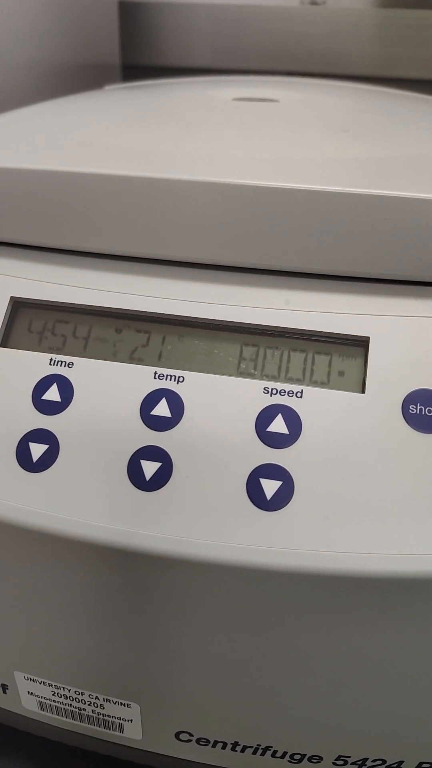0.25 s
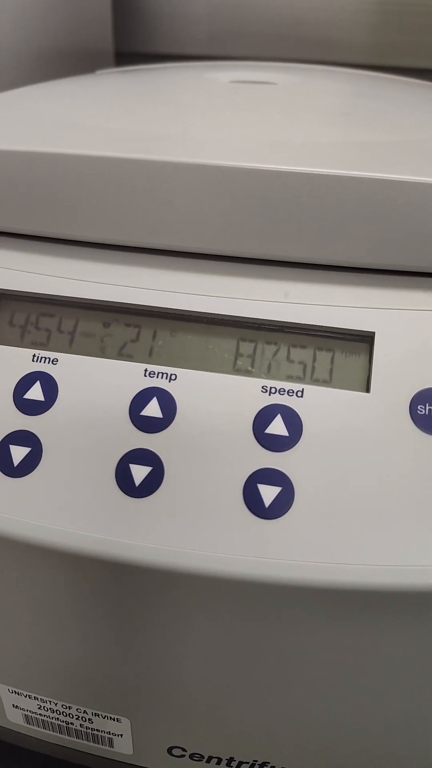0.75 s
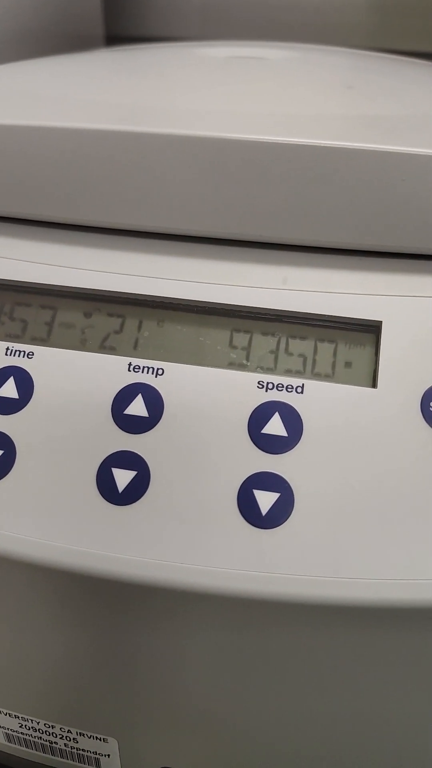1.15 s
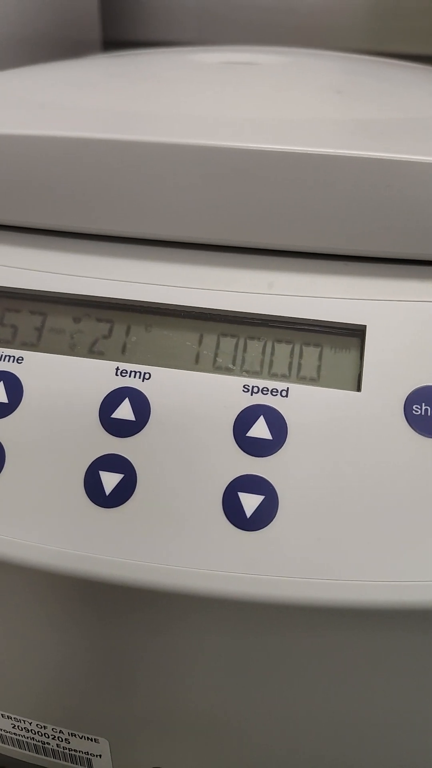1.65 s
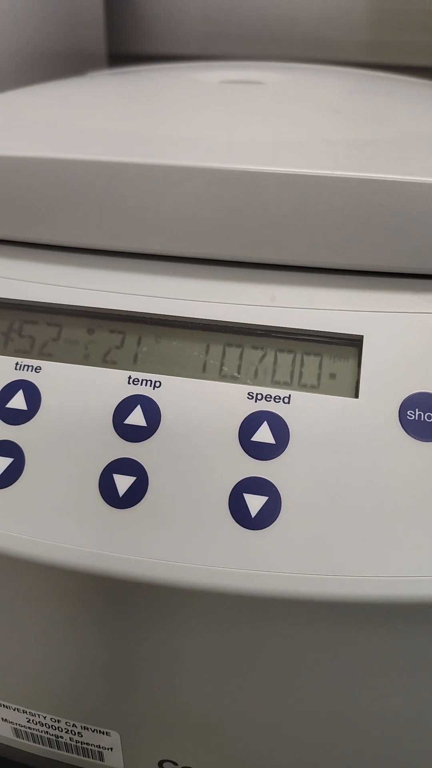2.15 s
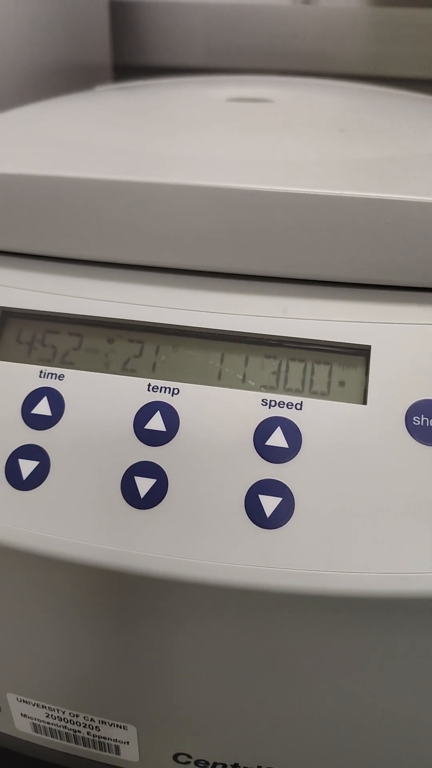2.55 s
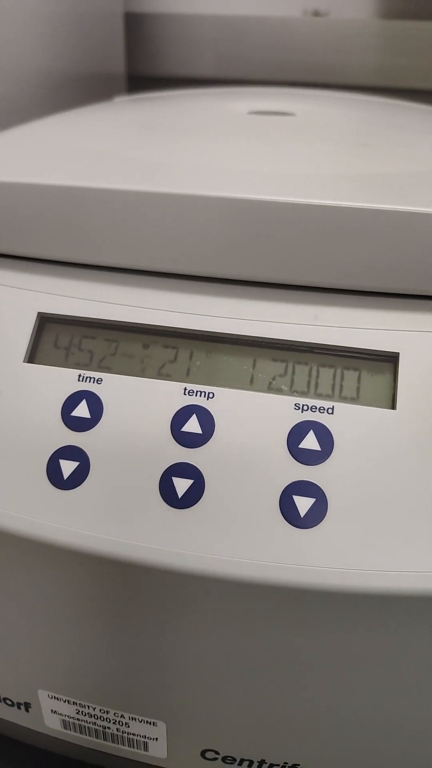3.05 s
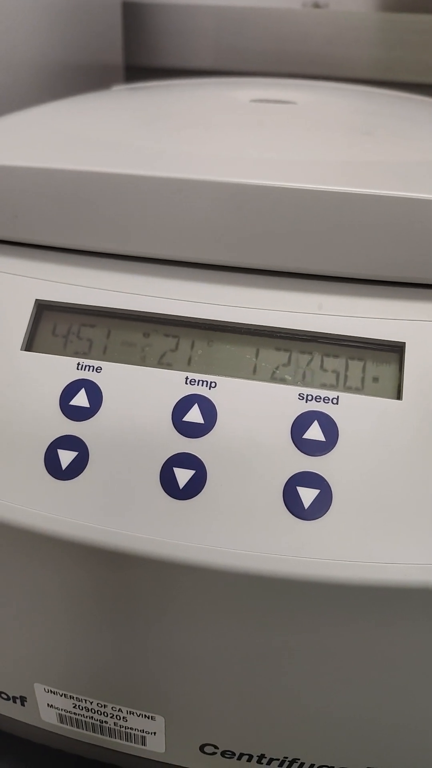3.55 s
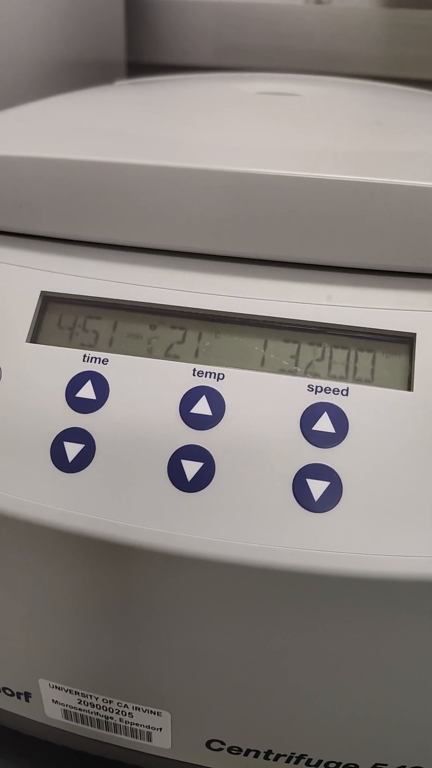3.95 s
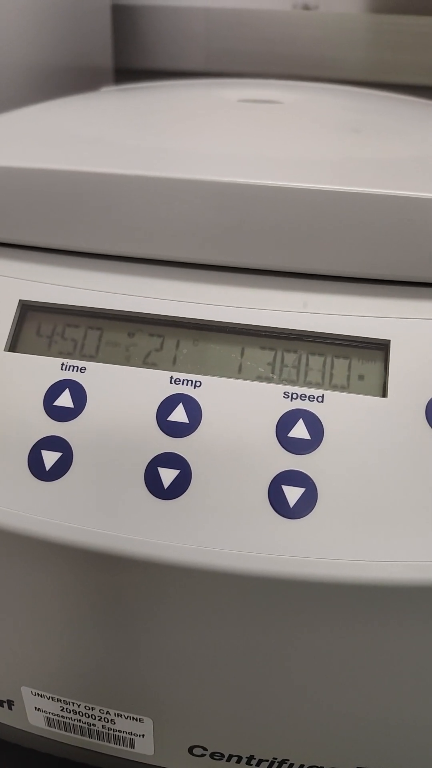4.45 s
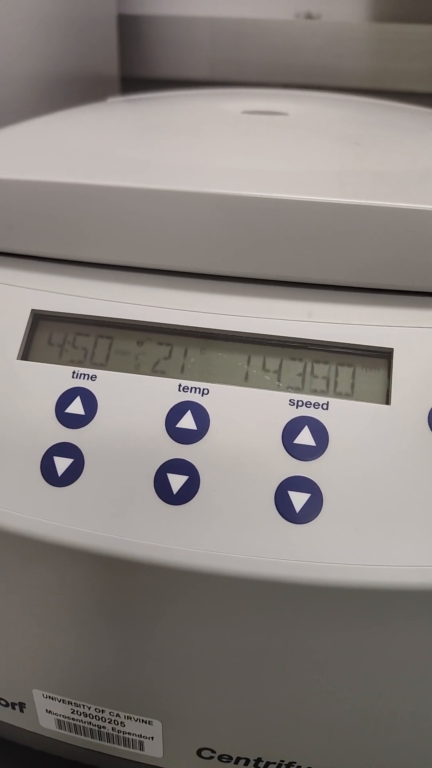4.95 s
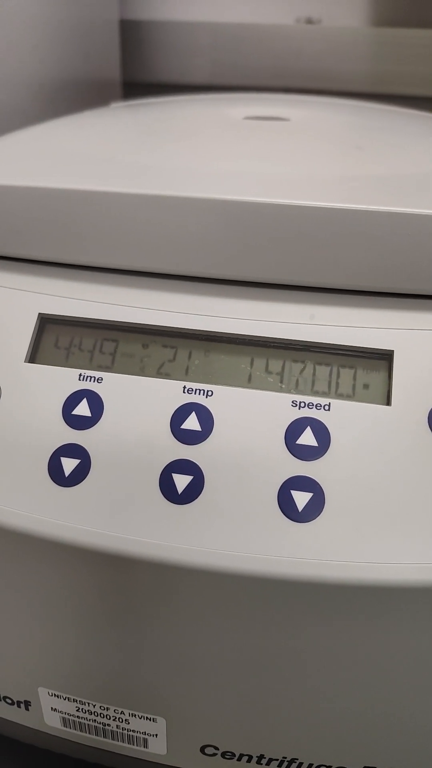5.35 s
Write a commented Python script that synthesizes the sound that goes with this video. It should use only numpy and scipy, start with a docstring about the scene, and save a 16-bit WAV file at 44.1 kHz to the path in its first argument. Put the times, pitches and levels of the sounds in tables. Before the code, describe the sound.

A laboratory centrifuge is already spinning at the start and keeps accelerating for about five and a half seconds, heard close on a hand-held stereo phone. A low drone near 127 Hz glides up to almost twice that pitch, with overtones above it and rough, thin bearing whines shimmering in the treble. Steady mid-pitched hum, slowly varying high electrical tones and fan noise lie behind. Around 1.3 to 1.7 seconds a bass rumble swells, then recedes by 2. Short whistling harmonics rise and fade throughout, and faint high drive tones are clearest around 2.5 to 3. From 3 seconds the rumble and airy hiss build, fullest near 5. The climb slows in the last second, the drone grows strong and a buzzy lid rattle joins at its resonances. At 5.4 a tiny sharp metallic double tick sounds at left. The highs are brighter left; the machine is still running at the end.

```python
"""A bench centrifuge speeds up in a laboratory, heard from a hand-held phone just in front of it.
Unbalance, motor field and bearing balls give sines on multiples of the shaft speed, shaped by resonances;
a lid rattles, and noise stands for the air round the rotor. Cooling machinery hums on steady tones, a metal
part ticks, and fan noise and a bass rumble lie behind. The left microphone port is far brighter than the right."""
import sys
import numpy as np
from scipy import signal
from scipy.fft import rfft, irfft
from scipy.io import wavfile
from scipy.ndimage import uniform_filter1d

SR = 44100
rng = np.random.default_rng(int(sys.argv[2]) if len(sys.argv) > 2 else 0)


def unload_audio(sound):
    """Save the sound as a 16-bit wav file, at the path given as the first command line argument."""
    columns = np.transpose(np.atleast_2d(sound))
    # keep every value between -1 and 1, then stretch to whole-number steps
    steps = np.round(np.clip(columns, -1, 1) * 32767)
    wavfile.write(sys.argv[1], SR, steps.astype(np.int16))


N = 246502  # length in samples
FIELD_ORDER, BALL_ORDER = 4.115, 5.355  # motor field and bearing balls, in multiples of shaft speed


def undb(db):
    """Decibel law: 20 dB is a factor of ten in amplitude."""
    return 10 ** (np.asarray(db) / 20)


def level(x, db):
    """Root-mean-square scaling: brings a sound to the given level in dB."""
    return x * undb(db) / np.sqrt(np.mean(x ** 2))


def columns(table):
    """Linear interpolation in time: every column of a curve, one value a sample."""
    s, *values = np.transpose(table)
    return np.array([np.interp(np.arange(N) / SR, s, column) for column in values])


def at(table, hz):
    """Logarithmic frequency scale: reads a spectrum table at the given pitch."""
    table_hz, value = np.transpose(table)
    return np.interp(np.log(np.maximum(hz, 1)), np.log(table_hz), value)


def walk(rate_hz):
    """Slow random modulation: random steps at this rate, smoothed twice, with a spread near 1."""
    hold = int(SR / rate_hz)
    steps = np.repeat(rng.standard_normal(N // hold + 1), hold)
    smooth = uniform_filter1d(uniform_filter1d(steps, hold), hold)
    return 1.3 * smooth[:N]


def tone(turns, lead=0., start=None):
    """Simple harmonic motion: a sine of rms 1 at both ports, the left ahead by `lead` radians."""
    if start is None:
        start = rng.random()  # starting phase in turns
    port_lead = np.array([[.5], [-.5]]) * lead
    return np.sqrt(2) * np.sin(2 * np.pi * (turns + start) + port_lead)


def panned(x, pan_db):
    """Interaural level difference: half the left-minus-right dB is given to each port, with its sign."""
    return x * undb(np.array([[.5], [-.5]]) * pan_db)


def band(x, lo_hz, hi_hz):
    """Band-pass filtering: keeps one stretch of the spectrum."""
    return signal.sosfilt(signal.butter(2, [lo_hz, min(hi_hz, .45 * SR)], "band", fs=SR, output="sos"), x)


# phase by which the left port leads the right: (frequency [Hz], lead [rad])
PORT_LEAD = [(700, 0), (2330, -2.8), (3960, -6.8), (7060, -12.4), (11800, -14)]


def lead_at(hz):
    """Interaural phase difference: the lead of the left port depends on pitch."""
    return at(PORT_LEAD, hz)


# likeness of the sound at the two ports: (frequency [Hz], shared share of power [0-1])
PORT_LIKENESS = [(60, .93), (600, .86), (1300, .4), (2900, .3), (6000, .35), (14000, .05)]
# brightness of the left port against the right: (frequency [Hz], left minus right [dB])
PORT_BALANCE = [(60, 1.5), (200, -1.5), (600, 7.5), (1200, 2), (4000, -2), (6000, -0.5), (7200, 10),
                (8200, 15.5), (10500, 15), (13500, 5)]


def ports(spectrum, shared, resonances=()):
    """Partial coherence: colours a sound and mixes in unrelated noise at each port."""
    hz = np.arange(N // 2 + 1) * SR / N
    alike = np.clip(at(PORT_LIKENESS, hz), 0, 1)
    lead = np.exp(.5j * np.array([[1], [-1]]) * lead_at(hz))
    own = rfft(rng.standard_normal((2, N)))
    both = np.sqrt(alike) * rfft(shared) * lead + np.sqrt(1 - alike) * own
    colour_db = at(spectrum, hz)
    for centre_hz, width_hz, db in resonances:
        colour_db = colour_db + db / (1 + (2 * (hz - centre_hz) / width_hz) ** 2)
    return irfft(panned(both * undb(colour_db), at(PORT_BALANCE, hz)), N)


# run-up of the shaft: (time [s], speed [turns/s])
SHAFT_SPEED = [(0, 127.07), (.64, 142.38), (1.6, 166.25), (2.88, 196.82), (3.2, 204.25), (3.52, 211.09),
               (4.16, 223.73), (4.48, 229.8), (4.8, 235.5), (5.12, 240.6), (5.44, 244.89), (5.59, 246.54)]


def shaft_speed():
    """Angular acceleration: shaft turns per second at every sample."""
    return columns(SHAFT_SPEED)[0]


def response(hz, modes, order=1):
    """Resonance: gain at a moving pitch, the modes summed in power; a higher order has steeper flanks."""
    power = 0
    for centre_hz, width_hz, *db in modes:
        flank = (1 + (2 * (hz - centre_hz) / width_hz) ** 2) ** order
        power = power + (undb(db)[:, None] / flank) ** 2
    return np.sqrt(power)


# modes of rotor mount and bench: (centre [Hz], width [Hz], gain [dB])
MOUNT_MODES = [(151.8, 12.8, -36), (161, 8.3, -36.5), (180.5, 10.6, -45.5), (202.3, 7.6, -30),
               (212.9, 17, -30.5), (227.4, 7, -33), (237.74, 6.8, -18), (243.8, 9.5, -26)]
# modes of the casing: (centre [Hz], width [Hz], gain [dB])
CASING_MODES = [(403.2, 36, -40), (495, 28, -44.5), (544.3, 89, -38.5), (625.5, 55, -40), (683, 67, -42),
                (752, 70, -42), (775, 57, -42), (872, 130, -45), (919, 71, -40), (986, 34, -38)]
BETWEEN_DB = -56.5  # gain away from the modes


def shaking(hz):
    """Forced vibration: gain in dB of a low tone as it crosses the modes of mount and casing."""
    modes = np.hypot(response(hz, MOUNT_MODES)[0], response(hz, CASING_MODES, order=2)[0])
    return 20 * np.log10(np.hypot(modes, undb(BETWEEN_DB)))


# harmonics of the shaft, then the motor field: (multiple of shaft speed)
SHAFT_ORDERS = [1, 2, 3, 4, FIELD_ORDER]
# for each, added to the modes: (level at full speed [dB], gain per doubling of speed [dB], left minus right [dB])
SHAFT_LEVELS = [(0.9, 0, 3.5), (4, 12.5, 4.5), (2.5, 18, -2.5), (-2, 22, 3.5), (-4, -2, -5)]
# extra balance of the first harmonic: (frequency [Hz], left minus right [dB])
MOUNT_PAN = [(127, 1), (145, -1), (162, 0.5), (175, 1), (222, -11), (235, -2.5), (247, -6)]
FULL_SPEED = 240  # turns/s
FIELD_FADES_AT, FIELD_FADE_DB = 229, 1.8  # turns/s; dB lost per turn/s above it


def rotor(speed, turns):
    """Rotating unbalance: clean tones on the shaft speed swell as they cross the resonances."""
    out = 0
    for order, (db, gain_db, pan_db) in zip(SHAFT_ORDERS, SHAFT_LEVELS):
        heard_db = db + gain_db * np.log2(speed / FULL_SPEED) + shaking(order * speed) + 1.57 * walk(12)
        if order == FIELD_ORDER:  # the field tone dies away near full speed
            heard_db -= FIELD_FADE_DB * np.maximum(speed - FIELD_FADES_AT, 0)
        if order == 1:
            pan_db = pan_db + at(MOUNT_PAN, speed)
        out = out + panned(undb(heard_db) * tone(order * turns), pan_db)
    return out


SLIP_TURNS, SLIP_PER_S = .002, 40  # spread of the slip in turns; its random steps per second


def slipping_balls(turns):
    """Phase modulation: the balls slip a little, which roughens their high harmonics."""
    return turns + SLIP_TURNS * walk(SLIP_PER_S)


# harmonics of bearing balls and motor slots: (multiple of shaft speed)
BALL_ORDERS = [22.03, 24.75, 26.07, 28.02, 31.41, 6 * BALL_ORDER, 36.75, 7 * BALL_ORDER, 41.9, 42.88, 47.25,
               48.2, 52.55, 10 * BALL_ORDER, 57.9, 11 * BALL_ORDER, 63.91]
# for each, before the resonances: (left [dB], right [dB])
BALL_LEVELS = [(-42, -45), (-50, -51), (-45, -52), (-38, -50), (-45, -55), (-38, -43), (-52, -62),
               (-53, -63), (-56, -66), (-47, -58), (-49, -63), (-50, -62), (-47, -60), (-53, -65),
               (-52, -66), (-51, -66), (-52, -68)]
# treble resonances they sing on: (centre [Hz], width [Hz], left gain [dB], right gain [dB])
TREBLE_RINGS = [(4050, 550, -21, -13), (4680, 300, -18, -10), (5300, 300, -22, -17), (6740, 300, -3, -2),
                (7060, 480, 1, 0), (7450, 420, -2, 0), (8530, 280, 5, -8)]


def whine(speed, turns, waver_db=3):
    """Resonant amplification: high harmonics stand out, in patches, as they cross a treble resonance."""
    out = 0
    for order, db in zip(BALL_ORDERS, BALL_LEVELS):
        heard = undb(np.array(db)[:, None] + waver_db * walk(13))
        ring = response(order * speed, TREBLE_RINGS, order=2)
        out = out + heard * ring * tone(order * turns, 2 * np.pi * rng.random())
    return out


# harmonics that sing out for a moment:
# (middle [s], multiple of shaft speed, length [s], left [dB], right [dB])
SWELLS = [(.7, 5.02, 1.4, -53, -54), (1.62, 10.2, 0.55, -53.0, -50.0), (2.75, 15.51, .8, -66.0, -56.0),
          (3.2, 5.02, 1.1, -51.0, -53.0), (4.05, 6.02, 0.7, -54.0, -64.0), (4.35, 5, 1.1, -50, -52),
          (4.85, 10.0, 0.6, -54.0, -54.0), (5.0, 6.02, 1.1, -54.0, -71.0), (5.03, 15.5, 1.1, -59.0, -64.0),
          (5.45, 21.64, .6, -51, -57), (5.5, 20.83, .5, -55, -54), (5.04, 6.99, 0.59, -56.0, -58.0),
          (5.23, 12.38, 0.71, -65.0, -57.0), (5.3, 6 * BALL_ORDER, .8, -40, -52)]


def whistles(speed, turns, waver_db=3):
    """Amplitude modulation: each swell fades in and out and wavers, with the port lead of its mid pitch."""
    s, out = np.arange(N) / SR, np.zeros((2, N))
    for mid_s, order, length_s, *db in SWELLS:
        on = np.abs(s - mid_s) < length_s / 2
        fade = np.cos(np.pi * (s[on] - mid_s) / length_s) * undb(waver_db * walk(15)[on])
        mid_hz = order * np.interp(mid_s, s, speed)
        out[:, on] += undb(db)[:, None] * fade * tone(order * turns[on], lead_at(mid_hz))
    return out


# bands of the buzz: (centre [Hz], width [Hz])
RATTLE_BANDS = [(2000, 620), (8900, 830)]
# for each band: (level relative to the gain of shaking() [dB])
RATTLE_LEVELS = [-23, -22.5]


def rattle(speed, power=2):
    """Nonlinear contact: the lid buzzes when the unbalance shakes it hardest."""
    shake_db = shaking(speed)
    peak_db = shake_db.max()
    loose = undb(peak_db + power * (shake_db - peak_db))
    noise = ports([(20, 0), (20000, 0)], rng.standard_normal(N))
    buzz = 0
    for (centre_hz, width_hz), db in zip(RATTLE_BANDS, RATTLE_LEVELS):
        buzz = buzz + level(band(noise, centre_hz - width_hz / 2, centre_hz + width_hz / 2), db)
    return loose * buzz


# faint harmonics of shaft, balls and cage: (multiple of shaft speed, level re the uncoloured noise [dB])
RIDING_TONES = [(7.02, -28), (8.02, -25), (10.21, -20), (10.62, -22), (11.03, -24), (12.03, -24),
                (16.4, -27), (20.62, -21), (21.04, -24), (21.64, -24), (22.06, -20), (23.06, -25),
                (24.73, -20), (25.08, -24), (26.07, -20), (26.94, -26), (28.02, -25), (30.06, -23),
                (32.2, -24), (32.96, -26), (35.62, -26), (37.52, -25), (40.82, -26), (42.9, -21),
                (44.92, -23), (45.3, -24), (47.29, -22), (51.17, -26), (52.58, -24), (53.2, -26),
                (53.6, -25), (58.73, -24), (60.1, -26), (64.02, -25)]
# air and bearing hiss through the lid: (frequency [Hz], relative density [dB per Hz])
HISS_SPECTRUM = [(300, -17), (1100, -13), (1760, -16.5), (4000, -12.5), (6200, -10), (6700, -7.5),
                 (7400, -6.5), (8000, -19.5), (9300, -15), (10500, -21.5), (11300, -31.5), (12300, -34),
                 (14100, -31)]
# resonances and cancelling reflections of lid and bench: (centre [Hz], width [Hz], gain [dB])
LID_COLOUR = [(2280, 120, -6), (2500, 200, 4), (2750, 150, -5), (3050, 200, 3), (3450, 130, -12),
              (3800, 120, -3), (4030, 250, 5), (4330, 120, -3), (4620, 250, 3), (4900, 150, -3),
              (5650, 400, 1), (6300, 160, -8), (6520, 120, 4), (6750, 120, 3), (7080, 280, 7.5),
              (7440, 180, -6), (8520, 240, 9)]
# course of the hiss: (time [s], gain [dB], further gain of the top band [dB])
AIR_COURSE = [(0, -42.5, 3), (.6, -42.5, -37), (1.3, -43, -39), (2, -40, 3), (2.8, -38.5, 1),
              (3.7, -36, -6), (4.5, -33.5, 2), (5.1, -32, 3.5), (5.59, -33.5, 6)]


def hiss(turns, patchy_db=4):
    """Turbulence noise: broadband air plus faint patchy harmonics, coloured by the lid."""
    source = rng.standard_normal(N)
    for order, db in RIDING_TONES:
        source += undb(db + patchy_db * walk(4)) * tone(order * turns)[0]
    sound = level(ports(HISS_SPECTRUM, source, LID_COLOUR), 0)
    air_db, top_db = columns(AIR_COURSE)
    top = band(sound, 10300, 16000)
    return undb(air_db) * (sound - top + top * undb(top_db + 2.2 * walk(14)))


def patchy(sound, slow_db=1.2, quick_db=1.6):
    """Time-varying filtering: narrow bands swell and flicker alone, so the resonances seem to shift."""
    out = sound.copy()
    for lo_hz in 900 * 2 ** np.arange(0, 3.5, 1 / 5):  # a band every fifth of an octave
        flicker = undb(slow_db * walk(2.984) + quick_db * walk(11.0))
        out += band(sound, lo_hz, 1.14 * lo_hz) * (flicker - 1)
    return out


# a tiny metal part: (time [s], gain [dB])
TICKS = [(5.4097, -24), (5.4129, -24.5), (5.4174, -33), (5.4224, -32)]
# its modes: (frequency [Hz], relative level [dB], 60 dB decay time [s])
TICK_MODES = [(8800, 7, 0.0071), (9330, 2, 0.02), (10760, -7, 0.014)]


def ticks(pan_db=18):
    """Free decay: a tiny metal part clicks and its modes ring briefly."""
    s = np.arange(SR // 20) / SR
    out = np.zeros(N + len(s))
    for at_s, db in TICKS:
        ring = sum(undb(mode_db - 60 * s / t60) * tone(hz * s)[0] for hz, mode_db, t60 in TICK_MODES)
        attack = np.minimum(s / 0.00092, 1)
        out[int(at_s * SR):][:len(s)] += undb(db) * ring * attack / 2
    return panned(out[:N], pan_db)


# hum, beating tone, low and high drive tones: (frequency [Hz])
STEADY_TONES = [593.7, 954.9, 9807.7, 10167.6]
# hum, low and high drive tones: (left minus right [dB])
STEADY_PAN = [6, 23, 21]
# left port, sinking near full speed: (time [s], level [dB])
HUM_LEVEL = [(0, -30.5), (.7, -28.5), (3.8, -29.5), (4.7, -35.5), (5.59, -35)]
# left port, these three drifting as the phone moves: (time [s], level [dB])
BEATING_LEVEL = [(0, -41.5), (.5, -39), (.9, -48.5), (1.45, -52), (1.7, -52), (2.2, -48), (2.6, -42),
                 (3, -38), (5.59, -38)]
DRIVE_LOW_LEVEL = [(0.1, -44), (.5, -62), (1.2, -40.5), (1.9, -43.5), (2.2, -47), (2.5, -39), (2.9, -36.5),
                   (3.7, -41), (4.05, -56), (5.59, -65)]
DRIVE_HIGH_LEVEL = [(0, -43.5), (.6, -46.5), (.95, -58), (1.95, -53), (2.2, -66), (2.9, -43), (3.7, -45),
                    (4.05, -60), (5, -66), (5.501, -60)]


def hum():
    """Periodic forcing: steady tones of compressor, fans and motor drive."""
    s = np.arange(N) / SR
    hum_db, low_db, high_db = (columns(c)[0] for c in (HUM_LEVEL, DRIVE_LOW_LEVEL, DRIVE_HIGH_LEVEL))
    out = beating(s) + thin_whistles() + faint_tones(s)
    for hz, db, pan_db in zip(np.delete(STEADY_TONES, 1), (hum_db, low_db, high_db), STEADY_PAN):
        out += undb(db + 0.45 * walk(13.0)) * tone(hz * s, lead_at(hz)) * undb([[0], [-pan_db]])
    # a faint companion of the low drive tone: 9927 Hz, 18 dB under it
    out[0] += undb(low_db - 18) * tone(9927 * s)[0]
    return out


BEATING_RIGHT_DB, TWIN_HZ = -46.5, 955.94
# a moment of cancelling at the left, then the right port: (time [s])
TWIN_CANCELS = [3.5, 2.8]
# the twin at the left, then the right port: (level [dB])
TWIN_LEVELS = [-61, -43.5]


def beating(s):
    """Beats: two close tones cancel whenever their phases are opposed."""
    main_hz = STEADY_TONES[1]
    left_db = columns(BEATING_LEVEL)[0]
    start, lead = rng.random(), lead_at(TWIN_HZ)
    main = undb([left_db, BEATING_RIGHT_DB + 0 * s]) * tone(main_hz * s, lead, start)
    opposed = start + .5 - (TWIN_HZ - main_hz) * np.array(TWIN_CANCELS)[:, None]
    return main + undb(TWIN_LEVELS)[:, None] * tone(TWIN_HZ * s, lead, opposed)


# sinks and fades: (time [s], frequency [Hz], level [dB])
SINKING_WHISTLE = [(0, 7730, -51), (1.5, 7660, -54), (3, 7600, -59), (4, 7580, -80)]
# passes at mid speed: (time [s], frequency [Hz], level [dB])
PASSING_WHISTLE = [(0, 8370, -80), (2.2, 8370, -70), (2.45, 8370, -52), (3.1, 8370, -54), (3.5, 8370, -70),
                   (5.59, 8370, -80)]


def thin_whistles():
    """Frequency modulation: two thin wavering whistles, at the left port only."""
    out = np.zeros((2, N))
    for hz, db in (columns(SINKING_WHISTLE), columns(PASSING_WHISTLE)):
        out[0] += undb(db + 2 * walk(21)) * tone(np.cumsum(hz) / SR)[0]
    return out


# fainter steady tones: (frequency [Hz])
FAINT_TONES = [121, 1243.5, 3390]
# for each: (left [dB], right [dB])
FAINT_LEVELS = [(-55, -56), (-59, -64), (-76, -71)]


def faint_tones(s):
    """Superposition: a few fainter tones whose levels wander slowly."""
    return sum(undb(np.array(db)[:, None] + walk(2.7)) * tone(hz * s, lead_at(hz))
               for hz, db in zip(FAINT_TONES, FAINT_LEVELS))


# fans and machinery: (frequency [Hz], relative density [dB per Hz])
ROOM_SPECTRUM = [(25, -99), (50, -34), (80, -22.5), (130, -19), (220, -15.5), (300, -23.5), (450, -24.5),
                 (620, -19), (800, -32), (950, -27.5), (1360, -36.5), (2500, -34.5), (5000, -61),
                 (14000, -58)]
# low shaking of the bench: (frequency [Hz], relative density [dB per Hz])
BENCH_SPECTRUM = [(30, -66), (62, -47), (80, -13.5), (100, -16), (150, -5), (230, 5.5), (280, -12.5),
                  (600, -35)]
# course of that shaking: (time [s], gain [dB])
RUMBLE_COURSE = [(0, -55), (1, -49.5), (1.35, -41), (1.65, -41), (2.1, -54), (3, -41), (4.3, -35),
                 (5.59, -35.5)]
ROOM_DB, ROOM_LID_SHARE = -38.5, 0.73  # fan level in dB; how much of the lid's colour the fans take on


def room():
    """Filtered noise: steady fans off the same lid and bench, and a bass rumble that comes and goes."""
    colour = [(hz, width_hz, ROOM_LID_SHARE * db) for hz, width_hz, db in LID_COLOUR]
    fans = level(ports(ROOM_SPECTRUM, rng.standard_normal(N), colour), ROOM_DB)
    rumble = level(ports(BENCH_SPECTRUM, rng.standard_normal(N)), 0)
    return fans + rumble * undb(columns(RUMBLE_COURSE)[0])


def scene():
    """Superposition: the sounds of machine and room add up at the two ports."""
    speed = shaft_speed()
    turns = np.cumsum(speed) / SR
    balls = slipping_balls(turns)
    spin = rotor(speed, turns) + whine(speed, balls) + whistles(speed, turns) + rattle(speed)
    return spin + hum() + ticks() + patchy(hiss(balls) + room())


def record(dry):
    """Low-pass filtering: the phone cuts the top steeply above 14270 Hz."""
    return signal.sosfilt(signal.ellip(14, .5, 75, 14270, fs=SR, output="sos"), dry)


dry = scene()
out = record(dry)
unload_audio(out)
```